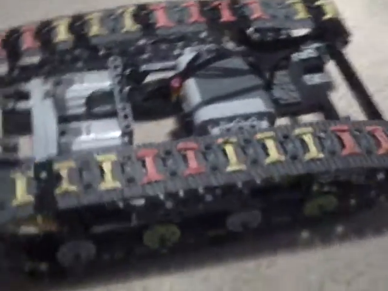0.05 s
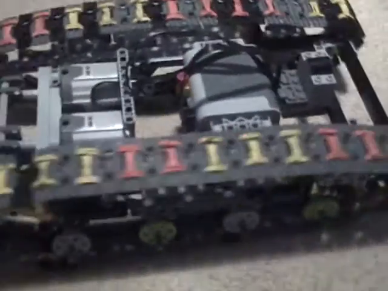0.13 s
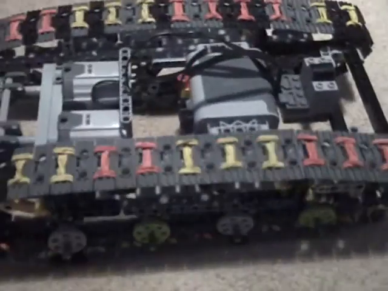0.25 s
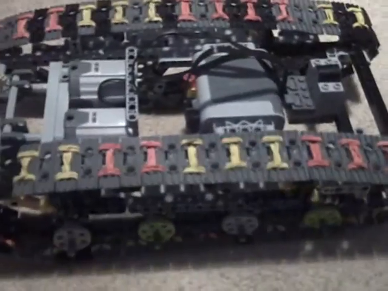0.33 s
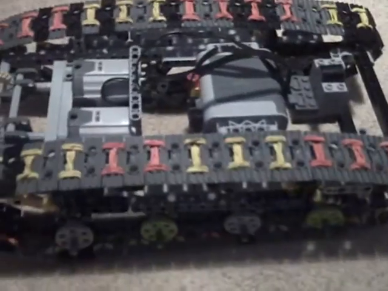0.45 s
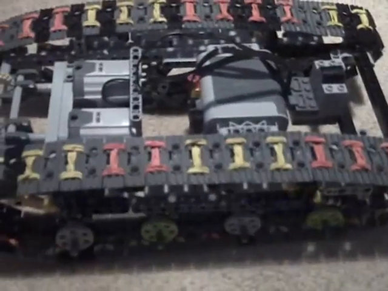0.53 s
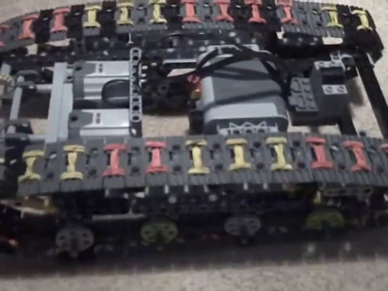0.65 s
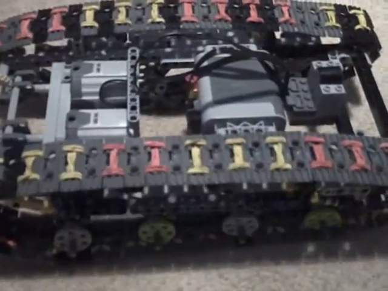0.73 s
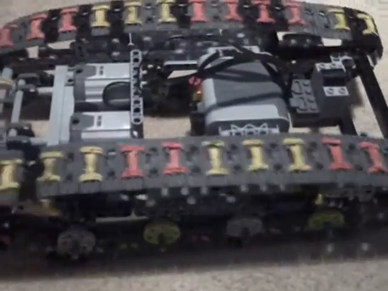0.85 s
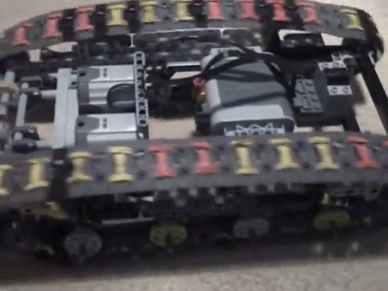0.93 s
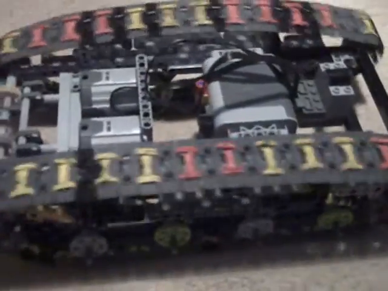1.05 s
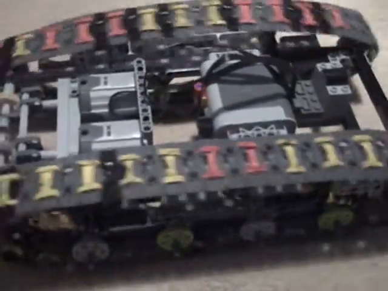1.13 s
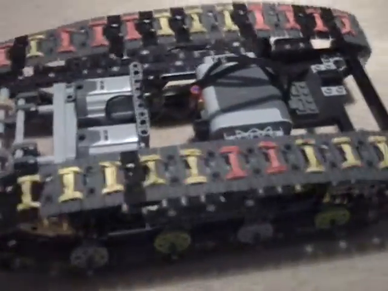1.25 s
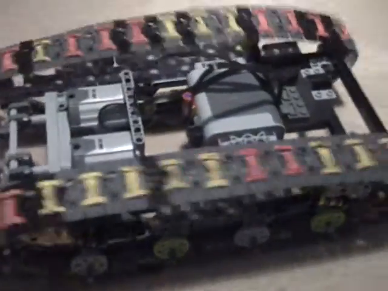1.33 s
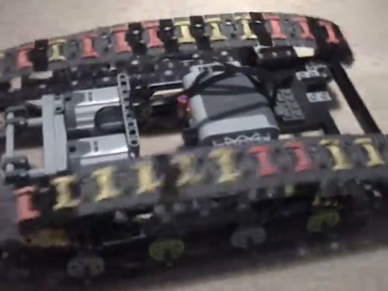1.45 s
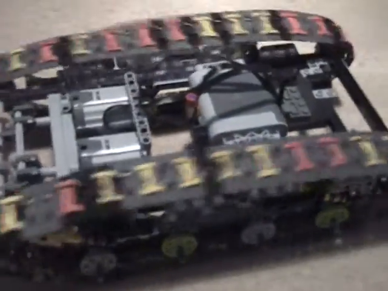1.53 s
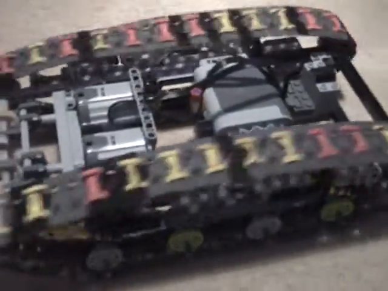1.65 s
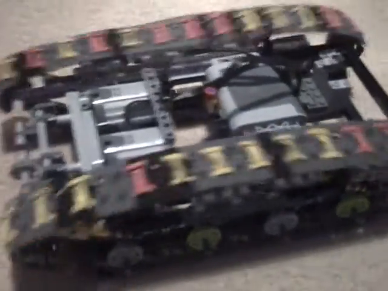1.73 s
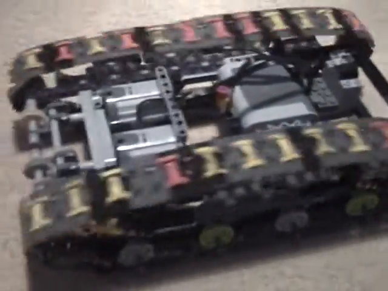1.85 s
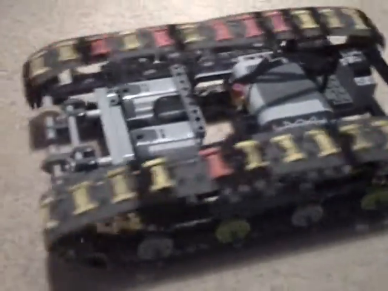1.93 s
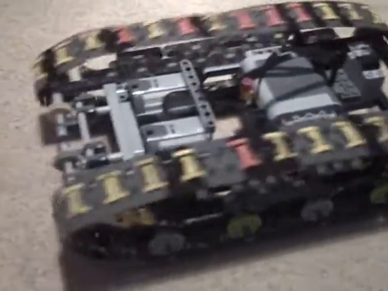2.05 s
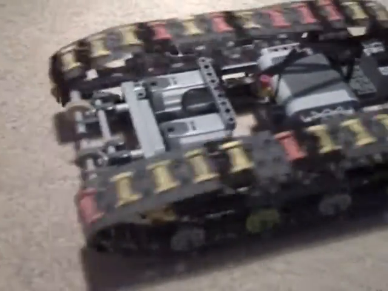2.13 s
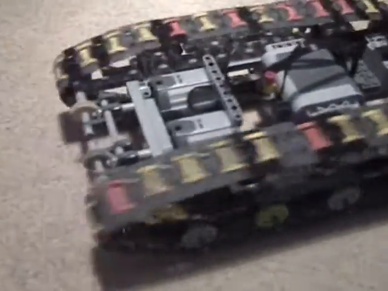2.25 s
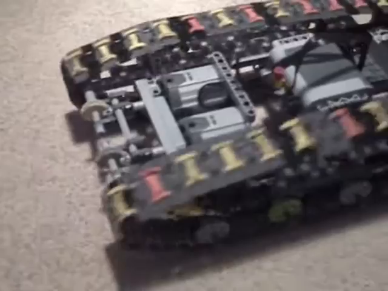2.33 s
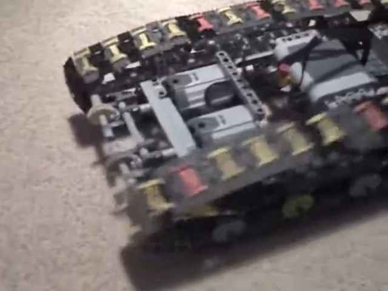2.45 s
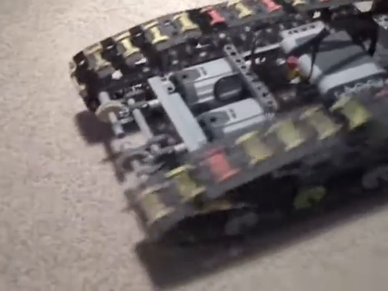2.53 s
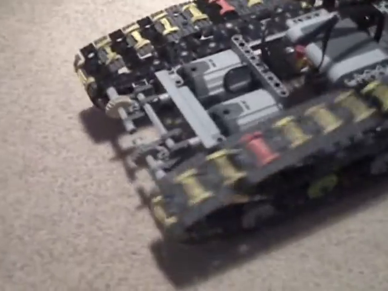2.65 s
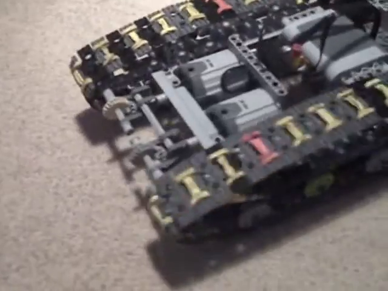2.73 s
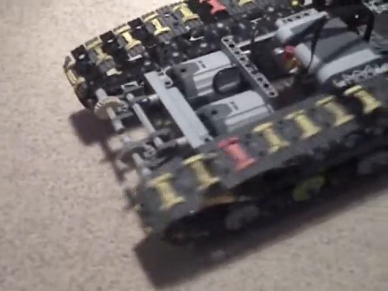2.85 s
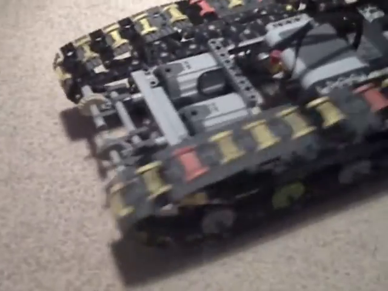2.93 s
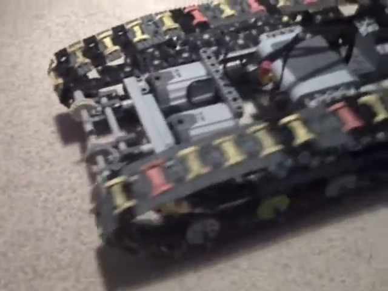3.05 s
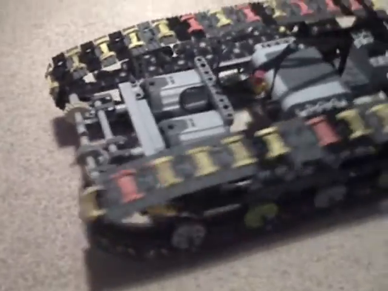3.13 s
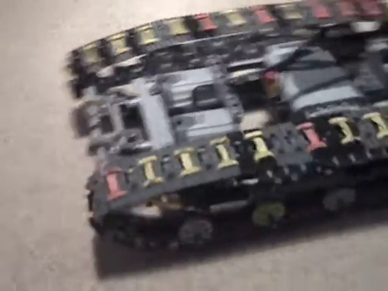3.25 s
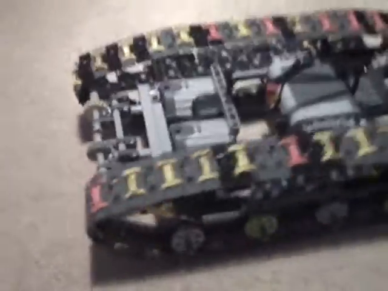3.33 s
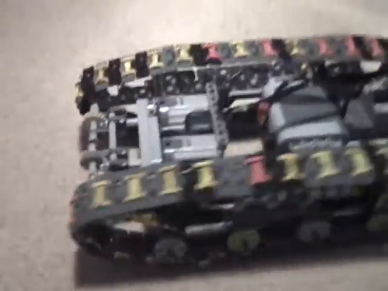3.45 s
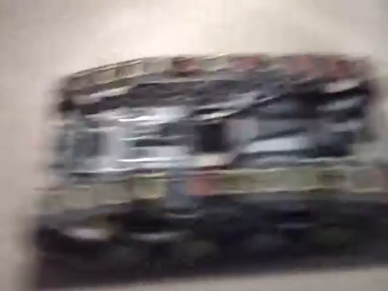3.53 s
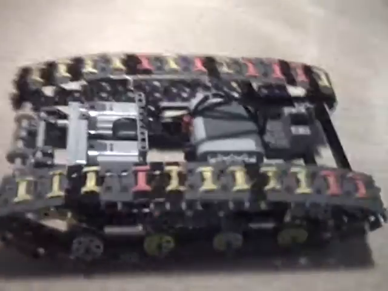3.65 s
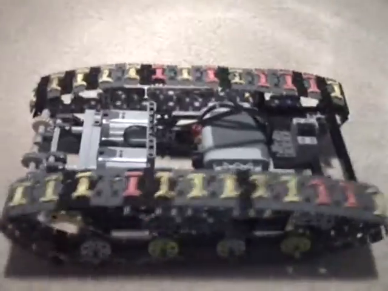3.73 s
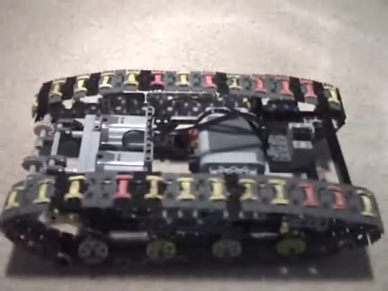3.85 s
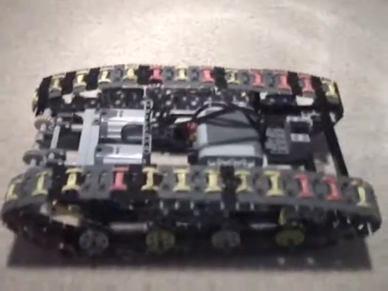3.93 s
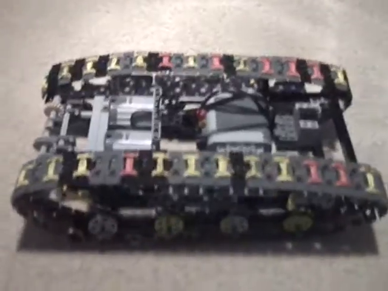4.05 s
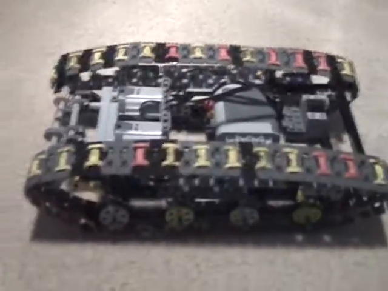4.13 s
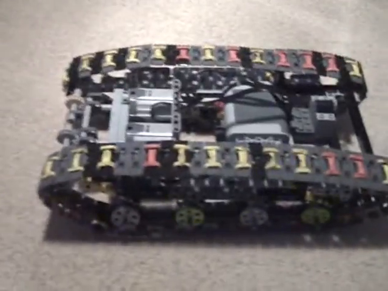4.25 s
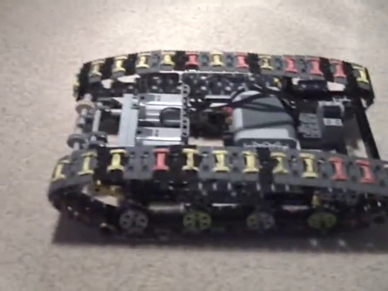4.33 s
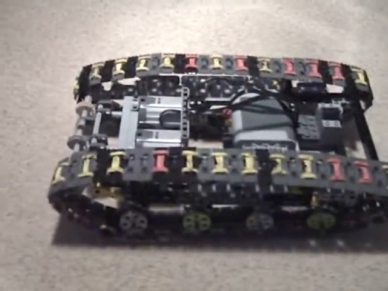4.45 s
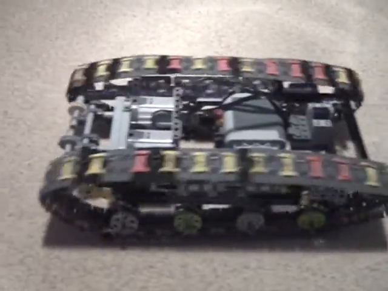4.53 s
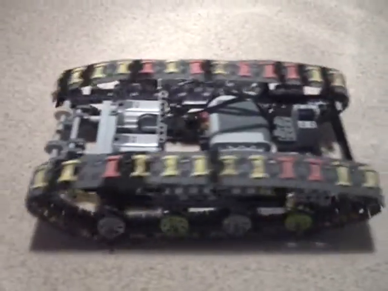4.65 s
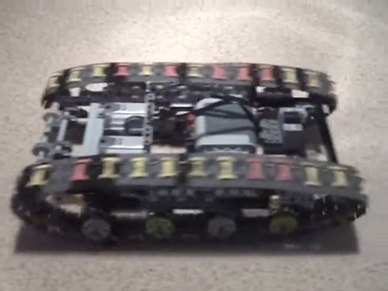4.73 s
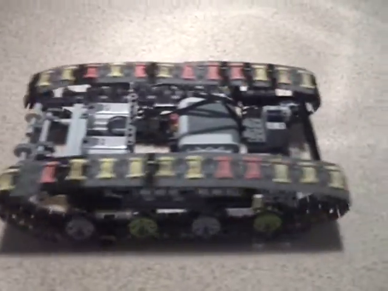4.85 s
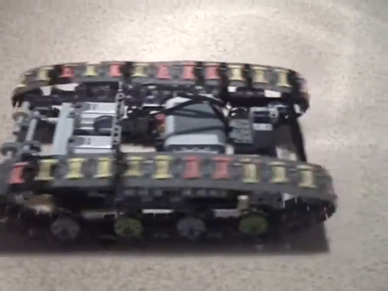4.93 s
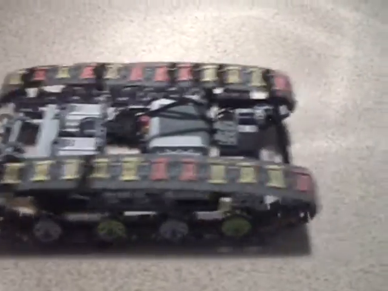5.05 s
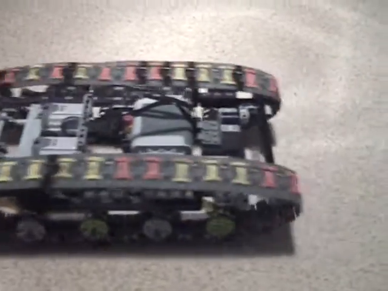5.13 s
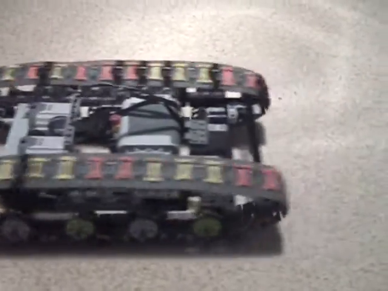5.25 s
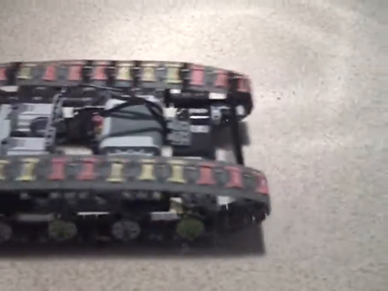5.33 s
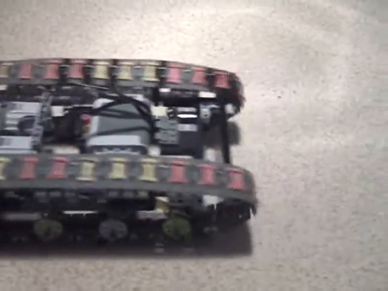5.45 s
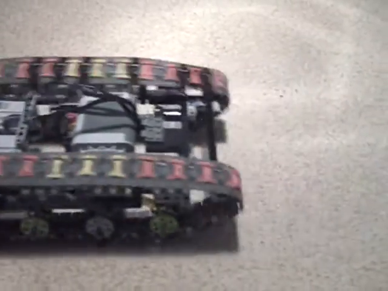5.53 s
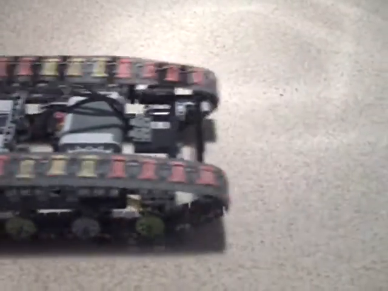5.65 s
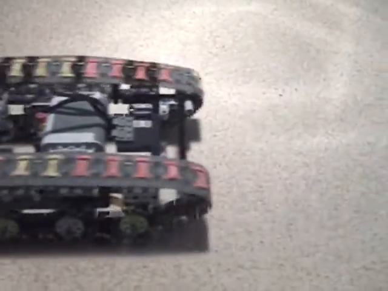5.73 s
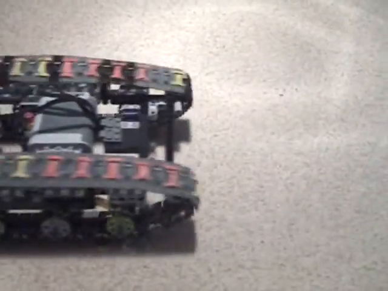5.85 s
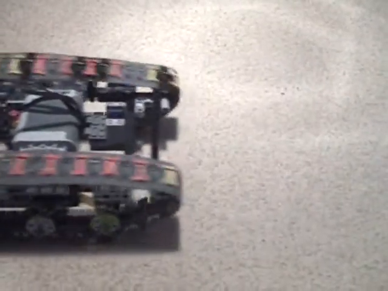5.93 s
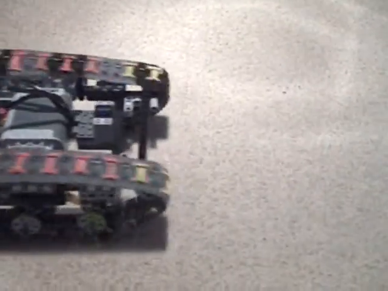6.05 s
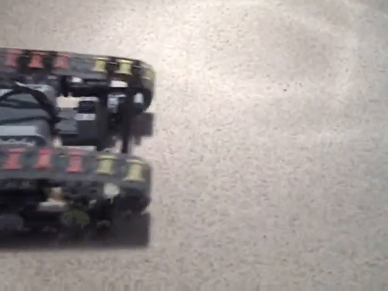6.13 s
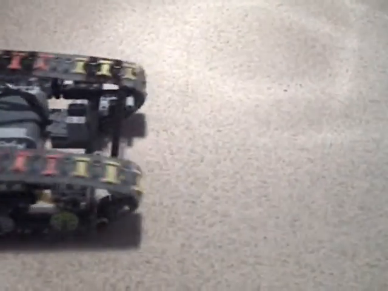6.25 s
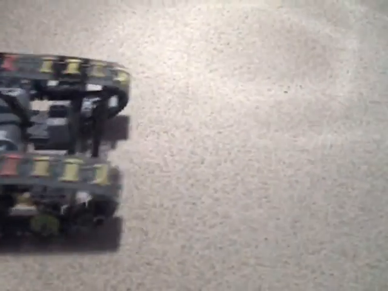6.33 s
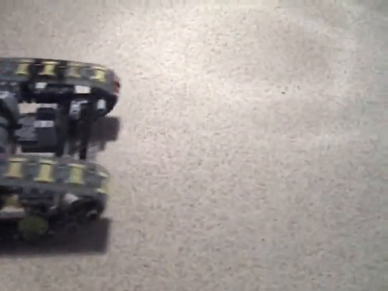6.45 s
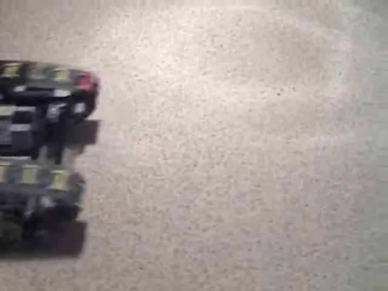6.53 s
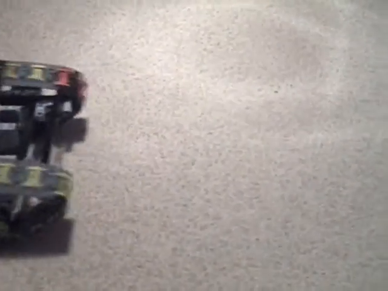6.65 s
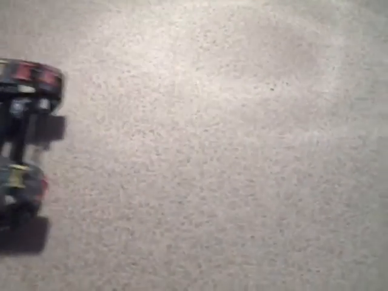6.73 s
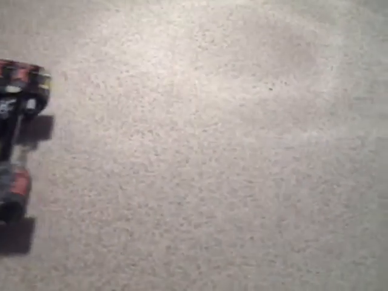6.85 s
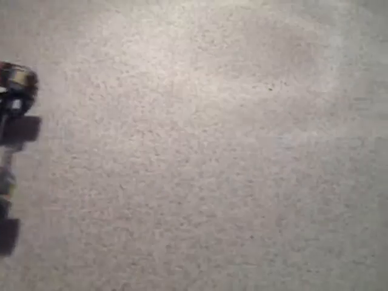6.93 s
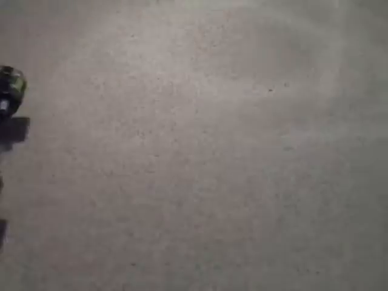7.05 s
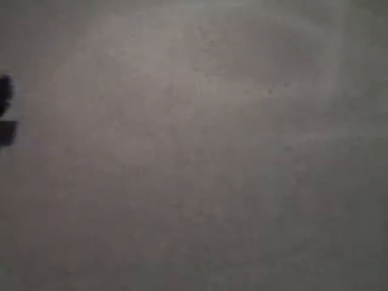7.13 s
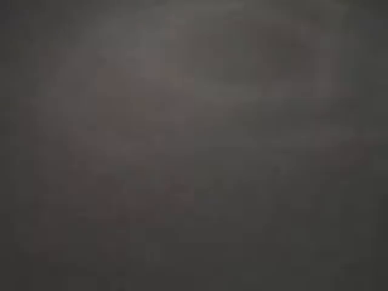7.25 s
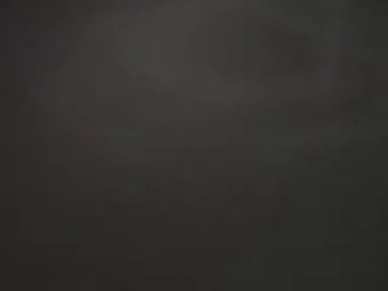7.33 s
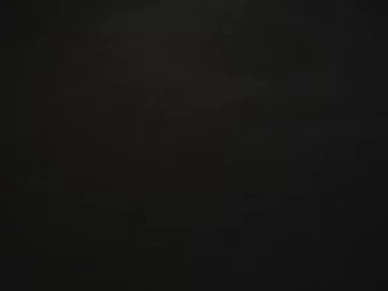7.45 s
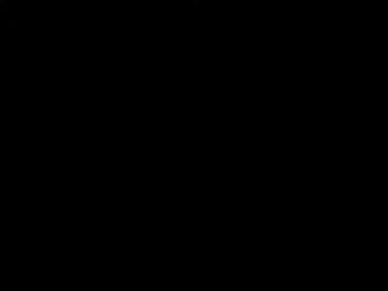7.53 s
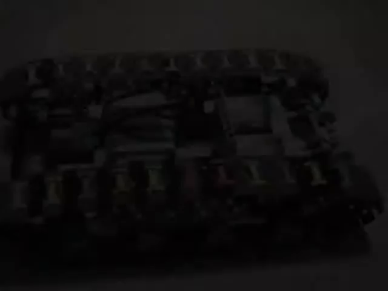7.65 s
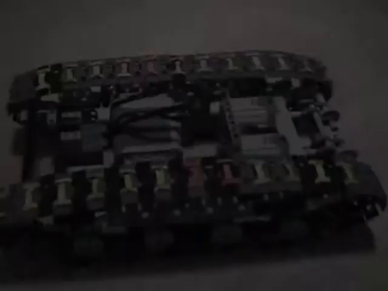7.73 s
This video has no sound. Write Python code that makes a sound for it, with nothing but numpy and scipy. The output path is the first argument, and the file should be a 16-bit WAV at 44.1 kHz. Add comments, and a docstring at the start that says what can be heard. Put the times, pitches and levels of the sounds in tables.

```python
"""A toy tracked vehicle of plastic bricks drives over carpet in a small room: four runs, a few nudges. Two
geared motors spin up, whine and surge under load; their mounts sing and hard-pressed gears whistle. Gear teeth
and track links clatter through the hollow plastic frame, with single ticks and snaps, and the links scrape the
sprockets in a turn. At the end the whole sound, room and all, fades out."""
import sys
import numpy as np
from scipy import signal
from scipy.fft import rfft, irfft
from scipy.io import wavfile
from scipy.ndimage import uniform_filter1d

SR = 44100
rng = np.random.default_rng(int(sys.argv[2]) if len(sys.argv) > 2 else 0)


def unload_audio(sound):
    """Save the sound as a 16-bit wav file, at the path given as the first command line argument."""
    columns = np.transpose(np.atleast_2d(sound))
    # keep every value between -1 and 1, then stretch to whole-number steps
    steps = np.round(np.clip(columns, -1, 1) * 32767)
    wavfile.write(sys.argv[1], SR, steps.astype(np.int16))


N = 343980
T = np.arange(N) / SR

# resonances of the slack gears and axles: centre_hz, width_hz, level_db
AXLE_MODES = [(1050, 450, -6.5), (1910, 1140, -6.5), (4080, 1240, -1), (6800, 1560, 2), (9000, 1500, -4.5),
              (9930, 1960, 2.5), (13500, 5100, -8.5)]


def undb(db):
    """Decibels to gain."""
    return 10 ** (np.asarray(db) / 20)


def unit(x):
    """Scale to rms 1."""
    return x / np.sqrt(np.mean(x ** 2))


def curve(rows):
    """Automation lanes: each column after the first, joined by straight lines in time."""
    times, *columns = np.transpose(rows)
    return [np.interp(T, times, column) for column in columns]


def gate(start, end, edge_s):
    """1 from start to end, dying away outside."""
    return np.exp(-np.maximum(np.maximum(start - T, T - end), 0) / edge_s)


def walk(rate_hz):
    """Smooth random wandering with rms 1."""
    step = max(int(SR / rate_hz), 1)
    zigzag = np.interp(T * rate_hz, np.arange(N), rng.standard_normal(N))
    return unit(uniform_filter1d(zigzag, step // 2 + 1))


def resonance(hz, modes):
    """Gain of a set of steep-sided resonances at the given frequencies."""
    return np.sqrt(sum(undb(db) ** 2 / (1 + (2 * (hz - f) / width) ** 2) ** 2 for f, width, db in modes))


def ring(modes, base_db, size=1024):
    """Minimum-phase impulse response of resonances over a flat base, with energy 1."""
    gain = resonance(np.fft.rfftfreq(size, 1 / SR), modes) + undb(base_db)
    cepstrum = irfft(np.log(gain))
    cepstrum[1:size // 2] *= 2
    cepstrum[size // 2 + 1:] = 0
    response = irfft(np.exp(rfft(cepstrum)))
    return response / np.linalg.norm(response)


def convolve(x, response):
    """Pass a sound through an impulse response."""
    return signal.oaconvolve(x, response)[:N]


def add(out, start_s, sound):
    """Mix a short sound in at start_s."""
    i = int(start_s * SR)
    out[i:i + len(sound)] += sound[:N - i]


def rattle(per_s, scatter_db, ring_s, ring_db):
    """Tiny impacts of uneven force; each hits another part and leaves its own brief ring; rms near 1."""
    force = undb(scatter_db * np.minimum(rng.exponential(size=N), 4))
    hits = (rng.random(N) < per_s / SR) * unit(force) * rng.choice([-1, 1], N)
    decay = undb(-60 / (ring_s * SR)) ** 2
    energy = signal.lfilter([1 - decay], [1, -decay], hits ** 2)
    ringing = np.sqrt(energy) * rng.standard_normal(N)
    return (hits + undb(ring_db) * ringing) / np.sqrt(per_s / SR * (1 + undb(ring_db) ** 2))


def envelope(since_on, since_off, attack_s, run_on_s, t60_s, jolt=0.12):
    """Starts with a jolt, builds up, holds, and dies away once the motors are off."""
    attack = 1 - (1 - jolt) * np.exp(-since_on / attack_s)
    return attack * undb(-60 * np.maximum(since_off - run_on_s, 0) / t60_s)


def tooth_phase(mesh_hz):
    """Phase of a gear with a little play, which smears its upper harmonics."""
    return 2 * np.pi * np.cumsum(mesh_hz * (1 + 0.008 * walk(260))) / SR


def flutter():
    """Tooth contact comes and goes: a raspy gain with rms 1."""
    return unit(undb(2.4 * walk(35) + 3 * walk(240)))


def swept_gain(hz, modes):
    """Gain of a gliding tone crossing resonances, updated every 64 samples."""
    return resonance(hz[::64], modes).repeat(64)[:N]


def driving():
    """Long runs: the motors surge four or five times a second as the tracks bind and let go."""
    # motor runs; sag is the share of speed missing at the start, surge the share by which it swings:
    # on_s, off_s, attack_s, sag, crest_s, period_s, surge, swell_db, song_db
    runs = [(-1, 0.4, 0.08, 0, 0.205, 0.245, 0.034, 0, 4),
            (0.9274, 2.842, 0.08, 0.45, 1.84, 0.187, 0.028, 1.1, 2.5),
            (2.925, 3.972, 0.12, 0, 3.485, 0.228, 0.03, 0.2, -1),
            (4.592, 7.7, 0.085, 0.45, 6.408, 0.208, 0.02, 0.2, 4)]
    # cruising as it steers, a list per run; hollow is the frame's low part against the clatter:
    # time_s, mesh_hz, clatter_db, hollow_db
    cruise = [
        [(0.0, 925, -35.5, -2.5), (0.4, 868, -37.5, -2.5)],
        [(1.1, 1075, -31.5, -4.5), (1.3, 1045, -30.5, -6), (1.48, 1086, -31.5, -6), (2.3, 1149, -32.5, -6.5),
         (2.55, 1135, -36.5, -5.5), (2.85, 1011, -35.5, -6)],
        [(3.05, 1048, -34.5, -8), (3.15, 1105, -34.5, -8.5), (3.25, 1020, -35.5, -8), (3.35, 904.3, -35.5, -5),
         (3.52, 903, -35, -5), (3.97, 888, -37, -4.5)],
        [(4.8, 1054, -34, -5.5), (5.55, 1055, -34, -4), (6.4, 1072, -36.5, -2.5), (7.5, 1080, -37, -3)],
    ]
    spin_up_s, strain_lag_s, strain_db = 0.15, 0.03, 3.5
    runs = np.array(runs)
    current_run = runs[np.searchsorted(runs[1:, 0], T)]
    on, off, attack, sag, crest, period, surge, swell_db, song_db = current_run.T
    cruise_hz, clatter_db, hollow_db = curve(np.vstack(cruise))
    spin_up = 1 - sag * np.exp(-(T - on) / spin_up_s)
    mesh_hz = cruise_hz * spin_up * (1 + surge * np.cos(2 * np.pi * (T - crest) / period))
    phase = tooth_phase(mesh_hz)
    strain = np.cos(2 * np.pi * (T - crest - strain_lag_s) / period)
    clicking = envelope(T - on, T - off, attack, run_on_s=0.0052, t60_s=0.17)
    booming = envelope(T - on, T - off, 0.7 * attack, run_on_s=0.028, t60_s=0.2)
    up_to_speed = clicking ** 2
    boom, click = track_clatter(mesh_hz, up_to_speed)
    links = clicking * undb(swell_db * strain - 0.23) * click
    gears = up_to_speed * undb(-3) * motors(mesh_hz, phase)
    hollow = undb(hollow_db) * (booming * undb(-1.73) * boom + gears)
    mount_db = hollow_db + song_db + strain_db * strain + 1.9 * walk(4)
    song = up_to_speed * undb(mount_db) * singing_mounts(mesh_hz, phase)
    return undb(clatter_db) * (links + hollow + song + whistles(phase))


def track_clatter(mesh_hz, up_to_speed, crossover_hz=5500):
    """Links land in bunches: the frame booms below the crossover, the small links click above it."""
    # resonances of links and frame: centre_hz, width_hz, level_db
    frame_modes = [(1090, 510, -11.5), (1673, 900, -5.5), (2220, 610, -5.5), (3273, 1640, -6.5),
                   (4193, 1530, -3.5), (4900, 490, -8.5), (6760, 890, 0.5), (8460, 3450, 5),
                   (10060, 1900, 3.5), (12530, 3200, -3), (15200, 2500, -9)]
    link_hz = mesh_hz * 0.052 * (1 + 0.054 * walk(9))
    link_phase = 2 * np.pi * np.cumsum(link_hz) / SR
    bunches = undb(0.65 * np.sin(link_phase) + walk(170) + 0.52 * walk(30))
    impacts = rattle(4000 + 4000 * up_to_speed, scatter_db=2.5, ring_s=0.011, ring_db=-3)
    clatter = convolve(impacts * bunches, ring(frame_modes, base_db=-40.5))
    bands = [signal.butter(4, crossover_hz, kind, fs=SR, output="sos") for kind in ("low", "high")]
    return [unit(signal.sosfiltfilt(band, clatter)) for band in bands]


def whine(mesh_hz, phase):
    """Twelve tooth harmonics of one motor, swelling as they cross the gearbox resonances."""
    # resonances of the gearbox: centre_hz, width_hz, level_db
    gearbox_modes = [(980, 280, -8.5), (1816, 250, -6), (2280, 320, 3.5), (2734, 250, -0.5), (3270, 830, 0),
                     (3800, 630, 2.5), (4610, 460, 4.5), (5240, 730, 0), (6600, 760, 2.5), (9530, 2200, 1)]
    return sum(swept_gain(k * mesh_hz, gearbox_modes) * flutter() * np.sin(k * phase)
               for k in range(1, 13))


def motors(mesh_hz, phase):
    """One motor leads; the other track's motor wanders around its speed."""
    other_hz = mesh_hz * (1 + 0.025 * walk(4.5))
    # weaker while spinning up, strongest when labouring, softest when running free
    load_db = np.interp(mesh_hz, [770, 870, 1000, 1140], [0.5, 2, -1.5, -9])
    lead = undb(-7) * whine(mesh_hz, phase)
    other = undb(-10) * whine(other_hz, tooth_phase(other_hz))
    return undb(load_db) * (lead + other)


def singing_mounts(mesh_hz, phase):
    """A tooth harmonic sings out while it lies on a resonance of the motor mounts."""
    # narrow resonances of the mounts: centre_hz, width_hz, level_db
    mount_modes = [(2146, 200, -17), (2370, 200, -12), (2740, 141, -19.5), (3248, 340, -13.5),
                   (4290, 220, -17)]
    tones = sum(swept_gain(k * mesh_hz, mount_modes) * np.cos(k * phase) for k in range(2, 6))
    return np.sqrt(2) * tones * flutter()


def whistles(phase):
    """A gear pressed hard while pulling away or steering rings on one tooth harmonic."""
    # gear whistles, set against the clatter: start_s, end_s, harmonic, level_db
    presses = [(0, 0.366, 2, -10), (0.138, 0.3, 10, -10), (1.054, 1.35, 4, -14.5), (1.473, 1.555, 3, -12),
               (3.069, 3.255, 2, -11.5), (3.273, 3.6, 5, -10.5), (3.318, 3.967, 2, -14.5),
               (3.4, 3.97, 11, -14), (4.68, 5.0, 2, -18), (4.76, 4.93, 5, -18), (4.9, 5.12, 3, -15)]
    tones = sum(undb(db) * gate(start, end, edge_s=0.0099) * np.cos(k * phase)
                for start, end, k, db in presses)
    return np.sqrt(2) * tones * flutter()


def room_reverb(t60_s, wet_db, size=16384):
    """A direct impulse followed by dense, fading reflections."""
    echoes = rng.standard_normal(size) * undb(-60 * np.arange(size) / SR / t60_s)
    response = undb(wet_db) * echoes / np.linalg.norm(echoes)
    response[0] = 1
    return response / np.linalg.norm(response)


def room_tone(level_db):
    """Faint, even background hiss and rumble."""
    # noise spectrum of the quiet room: frequency_hz, relative_db
    spectrum = [(18, -36), (30, -6), (292, -15), (350, -14.5), (399, -14), (622, -19), (787, -15.5),
                (1870, -15.5), (15500, -35.5)]
    hz, db = np.transpose(spectrum)
    bins_hz = np.maximum(np.fft.rfftfreq(2 * N, 1 / SR), 1)
    gain = undb(np.interp(np.log(bins_hz), np.log(hz), db))
    noise = irfft(rfft(rng.standard_normal(2 * N)) * gain)[:N]
    return undb(level_db) * unit(noise)


def clicks(axles, size=512):
    """Single teeth slide over and tick through the axles; strained plastic snaps with a short ring."""
    # gear teeth and links dropping into place: start_s, peak_db
    ticks = [(0.0434, -20), (0.1234, -20.5), (0.5625, -44), (0.6, -30), (0.652, -33), (0.7015, -28),
             (0.7206, -26), (0.7317, -29), (0.8868, -45), (2.8094, -22.5), (4.1292, -32), (4.1912, -28.5),
             (4.223, -30), (4.3056, -32), (4.4761, -47)]
    # sharp snaps of the plastic: start_s, peak_db, pitch_hz, width_hz
    snaps = [(2.899, -17, 7300, 1150), (2.899, -28.5, 4600, 600), (4.392, -34, 2700, 1500),
             (0.123, -24, 2540, 1100)]
    out = np.zeros(N)
    age = np.arange(size) / SR
    contact = age * np.exp(-age / 0.00053)
    for start, db in ticks:
        tick = signal.fftconvolve(axles, contact * rng.standard_normal(size))
        add(out, start, undb(db) * tick / np.abs(tick).max())
    for start, db, hz, width in snaps:
        snap = ring([(hz, width, 0)], base_db=-29)
        add(out, start, undb(db) * snap / np.abs(snap).max())
    return out


def nudges(axles):
    """A kick rattles the slack gears; they then coast to rest, tooth by tooth."""
    # short kicks of the motors: start_s, driven_s, relative_db, coast_t60_s
    kicks = [(0.587, 0.03, -37, 0.42), (0.71, 0.016, -43.5, 0.31), (0.922, .012, -39.5, 0.2),
             (4.128, 0.03, -44, 0.24), (4.191, 0.022, -39.5, 0.23), (4.309, 0.02, -44.3, 0.23)]
    push, coast = np.zeros((2, N))
    for start, length, db, t60 in kicks:
        push += undb(db) * gate(start, start + length, edge_s=0.0055)
        rise = np.clip((T - start) / length, 0, 1)
        coast += rise * undb(db - 60 * np.maximum(T - start - length, 0) / t60)
    # teeth pass faster the harder the gears were kicked; each gives a short burst
    tooth_hz = (105 + 260 * coast / coast.max()) * (1 + 0.14 * walk(200))
    since_tooth = np.cumsum(tooth_hz) / SR % 1 / tooth_hz
    teeth = unit(np.exp(-since_tooth / 0.00036) + 0.3)
    rattling = teeth * rattle(7000, scatter_db=2.5, ring_s=0.008, ring_db=-3)
    # slow contacts are softer, so they sound duller
    soft = signal.sosfilt(signal.butter(1, 5000, fs=SR, output="sos"), coast * rattling)
    slips = coast * rattle(150, scatter_db=0, ring_s=0.004, ring_db=-6)
    return convolve(undb(-7.5) * push * rattling + undb(-2) * soft + undb(-9) * slips, axles)


def scraping():
    """In a turn, links rub along the sprocket teeth with a bright, uneven hiss."""
    # strength of the rubbing: time_s, level_db
    rub = [(1.3, -70), (1.6, -41.5), (2.15, -45), (2.4, -36), (2.65, -37.5), (2.82, -42.5), (2.89, -73)]
    grains = rattle(3400, scatter_db=3.5, ring_s=0.01, ring_db=-4) * undb(2 * walk(25.13))
    sprocket = ring([(8400, 1350, 0)], base_db=-39)
    level = undb(curve(rub)[0]) * gate(rub[0][0], rub[-1][0], edge_s=0.0091)
    return level * convolve(grains, sprocket)


def scene():
    """The vehicle in a carpeted room, the same in both channels; it all fades out at the end."""
    fade_s = (5.66, 7.666)
    axles = ring(AXLE_MODES, base_db=-36)
    toy = driving() + scraping() + nudges(axles) + clicks(axles)
    room = convolve(toy, room_reverb(t60_s=0.35, wet_db=-14)) + room_tone(level_db=-66)
    mono = np.interp(T, fade_s, [1, 0]) * room
    return np.array([mono, mono])


def record(dry, top_hz=15850):
    """A steep low-pass cuts the highest treble."""
    return signal.sosfilt(signal.ellip(12, 0.1, 75, top_hz, fs=SR, output="sos"), dry)


dry = scene()
out = record(dry)
unload_audio(out)
```